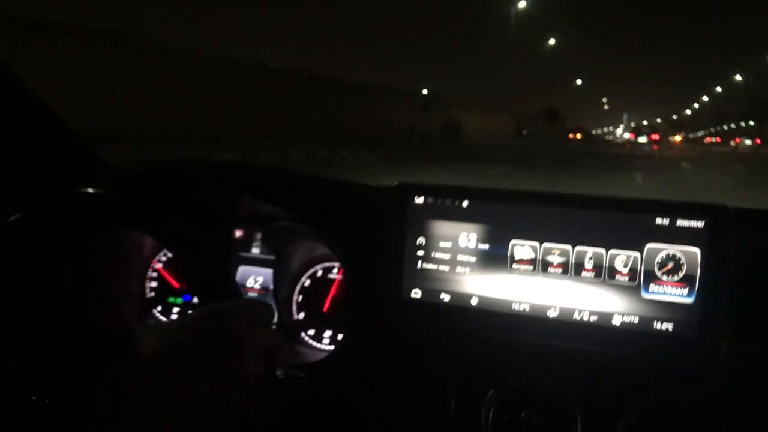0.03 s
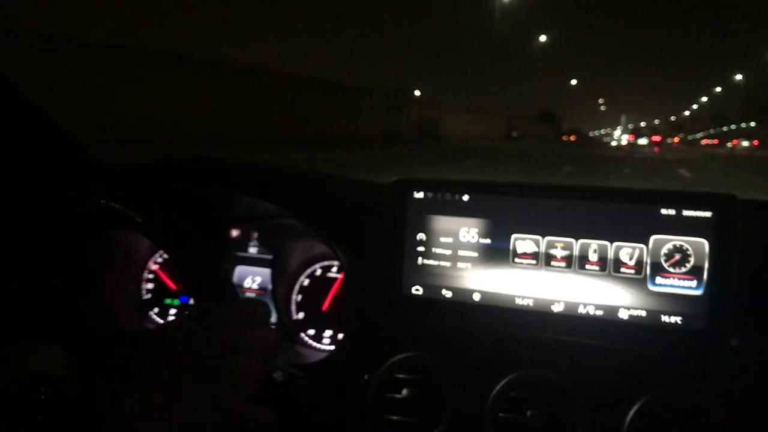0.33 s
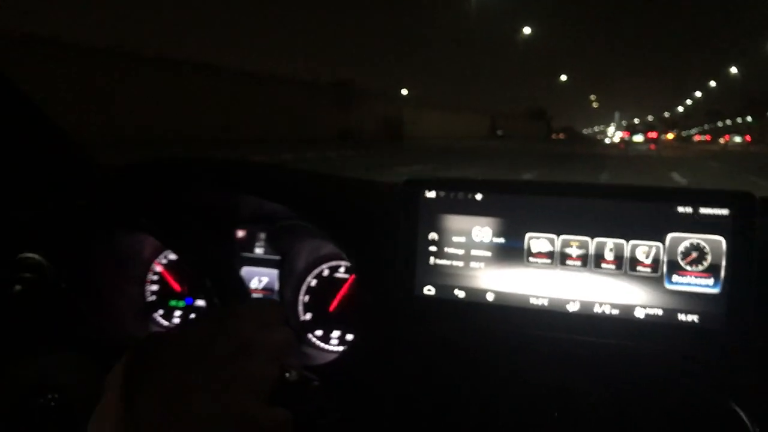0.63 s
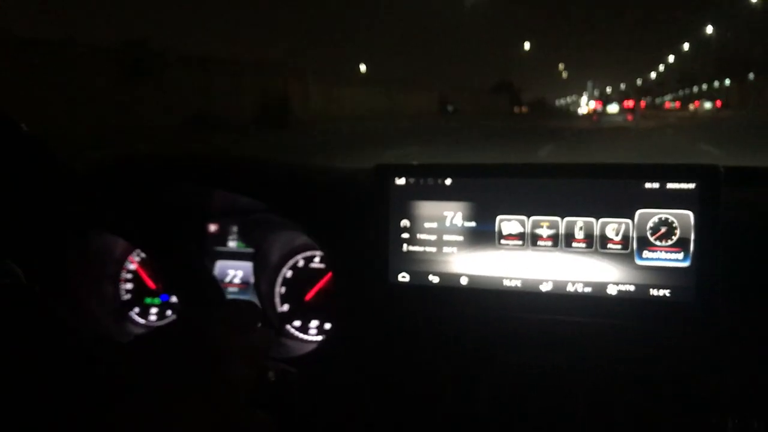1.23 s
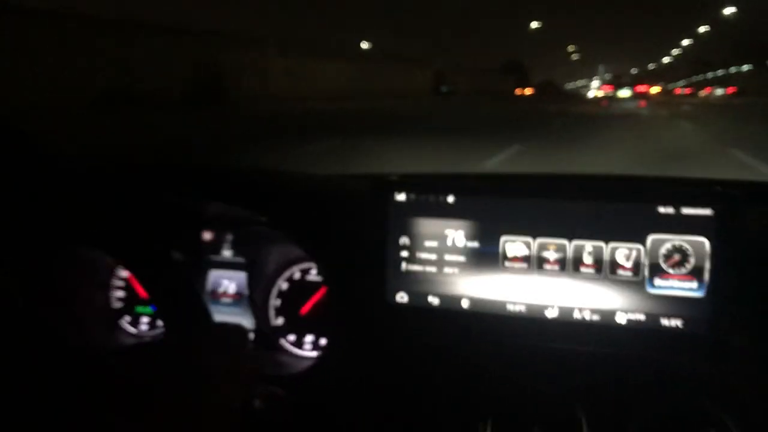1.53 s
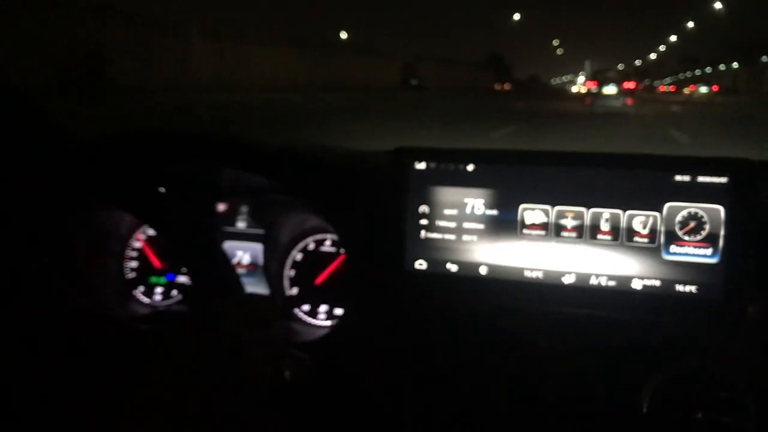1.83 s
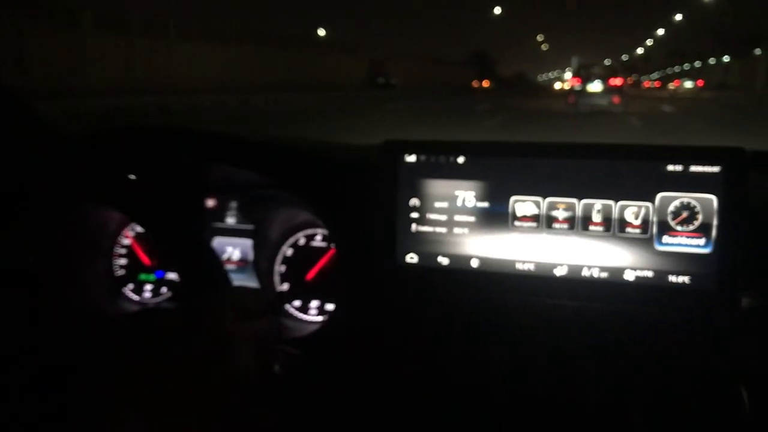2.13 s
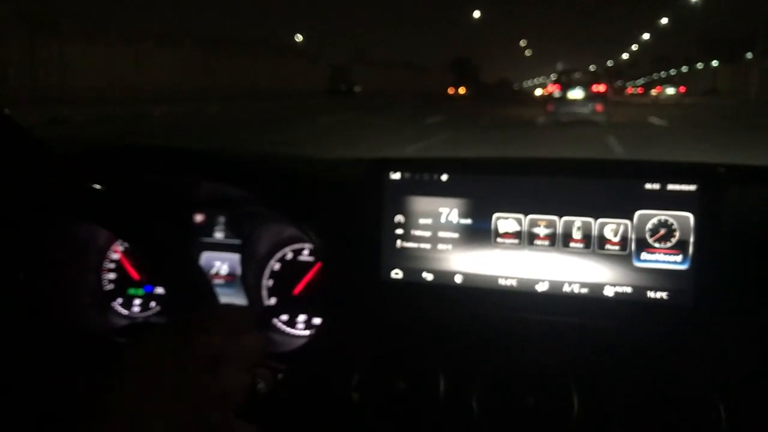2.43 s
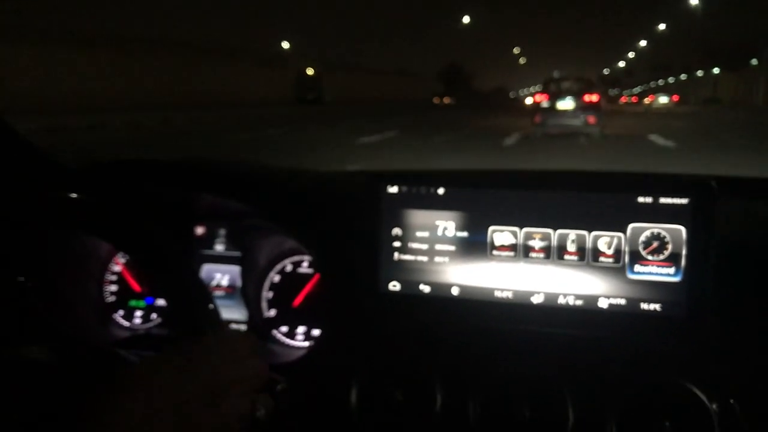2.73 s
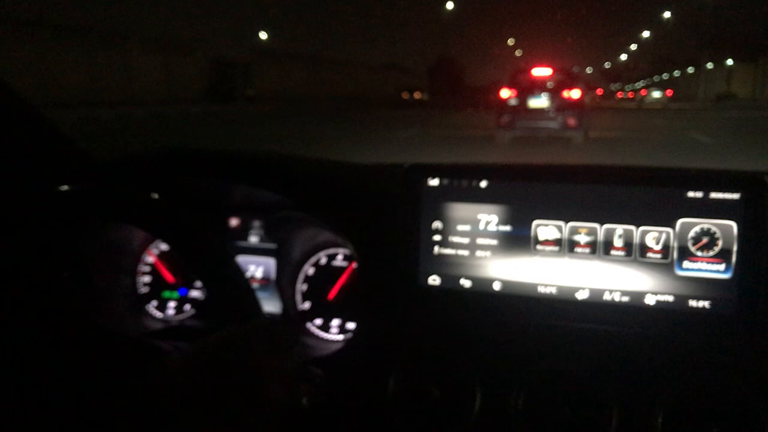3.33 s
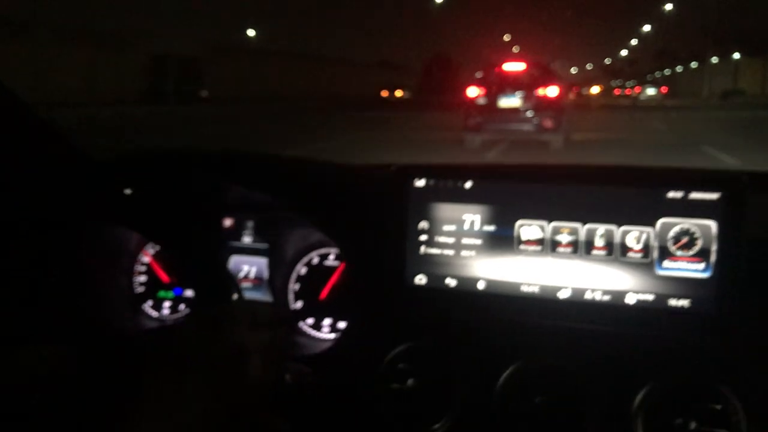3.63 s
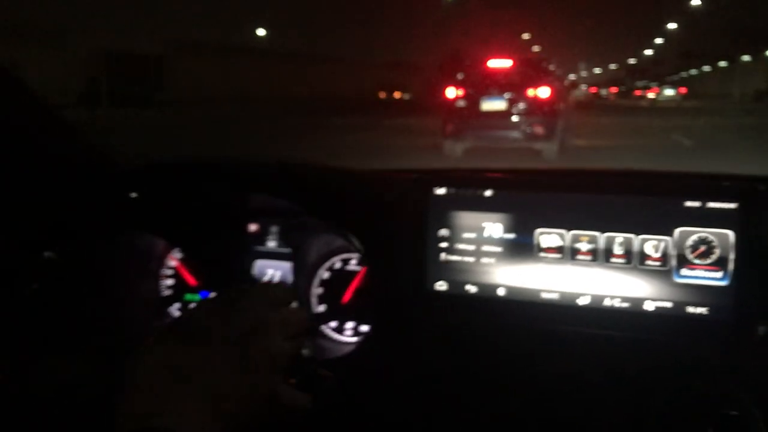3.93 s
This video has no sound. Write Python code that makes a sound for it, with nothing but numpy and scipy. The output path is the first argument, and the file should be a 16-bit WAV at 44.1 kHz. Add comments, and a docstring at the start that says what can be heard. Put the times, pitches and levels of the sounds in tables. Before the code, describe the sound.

A sports car engine drones, then its exhaust pops and bangs, heard from inside.

```python
"""A four-cylinder drone pulls over road rumble and tyre noise, inside a sports car on a night highway.
The driver lifts off: the pipe chuffs, the drone thins and sags, and unburnt fuel pops in the exhaust,
first as a burble, then in hard bangs. Each pop booms in the cabin and cracks with a ring of pipe metal;
the bangs set the trim buzzing."""
import sys
import numpy as np
from scipy import signal
from scipy.fft import rfft, irfft
from scipy.io import wavfile

SR = 44100
rng = np.random.default_rng(int(sys.argv[2]) if len(sys.argv) > 2 else 0)


def file_out(sig):
    """Save sig as 16-bit WAV at sys.argv[1]."""
    # one column per channel
    cols = np.atleast_2d(sig).T
    # limit, then scale
    lim = np.clip(cols, -1, 1)
    pcm = np.round(lim * 32767).astype(np.int16)
    wavfile.write(sys.argv[1], SR, pcm)


N = 176400
TIME = np.arange(N) / SR

# The main exhaust pops, with a fader per layer: start_s, boom_db, crack_db, buzz_db, sizzle_db
POPS = [(1.3326, -3, -69, -52, -77), (1.3516, -17, -65, -50, -78), (1.3965, -8, -70, -56, -72),
        (1.4203, -2, -70, -69, -76), (1.4345, -14, -56.5, -60, -74), (1.4566, -4.5, -76, -54, -80),
        (1.47, -18.5, -61, -45, -82), (1.6436, -19.5, -57, -50, -62), (1.6528, -8, -58, -53, -74),
        (1.7331, -4.5, -61, -46, -82), (1.7954, -8.5, -61, -68, -88), (1.8576, -9.5, -63, -46, -84),
        (1.9237, -7, -60, -43, -80), (1.9669, -5.5, -55.5, -56, -76), (2.0396, -6.5, -60.5, -49, -82),
        (2.1095, -4, -56, -61, -77), (2.2705, -5.5, -77, -48, -82), (2.3403, -6, -54, -55, -74),
        (2.3966, -7, -58, -48, -68), (2.461, -5.5, -62.5, -61, -82), (2.5094, -7, -77, -54, -82),
        (2.5624, 2.5, -50, -41, -74), (2.6687, -5, -54.5, -43, -73), (2.7525, -4, -50, -34.5, -61),
        (2.83, -7.5, -69, -42, -77), (2.885, -2.5, -55.5, -40, -78), (2.9683, -0.5, -51, -36.5, -64),
        (3.0773, -4.5, -59, -48, -83), (3.1741, -2.5, -52, -50, -62), (3.288, 1.5, -53, -37, -73),
        (3.392, -6.5, -53, -59, -79), (3.4435, -5, -78, -62, -84), (3.5228, 1, -46.5, -38.5, -55),
        (3.6018, -14, -52, -44, -63), (3.6473, -1, -49.5, -35, -52.5), (3.7226, -15, -50, -38, -53),
        (3.7457, 0.5, -50.5, -36, -60), (3.8205, -17, -53.5, -40, -60.5), (3.8966, -11.5, -51, -64, -64),
        (3.9064, -6, -78, -61, -78), (3.971, -20, -57.5, -56, -67)]


def amp(db):
    """Decibels to gain."""
    return 10 ** (np.asarray(db) / 20)


def unit(x):
    """Scales to rms 1."""
    return x / np.sqrt(np.mean(x ** 2) + 1e-20)


def curve(table, column=1):
    """One column of a time table, drawn as an automation lane."""
    rows = np.array(table)
    return np.interp(TIME, rows[:, 0], rows[:, column])


def noise(gain):
    """Noise of rms 1, shaped by a gain that is a function of frequency."""
    spectrum = rfft(rng.standard_normal(N))
    return unit(irfft(spectrum * gain(np.fft.rfftfreq(N, 1 / SR)), N))


def coloured(points):
    """Noise of rms 1 through an EQ curve of freq_hz, gain_db points."""
    hz, db = np.transpose(points)
    return noise(lambda f: amp(np.interp(np.log(f + 1), np.log(hz + 1), db)))


def ringing(hz, width_hz):
    """Noise of rms 1 in one steep resonance."""
    return noise(lambda f: 1 / (1 + (2 * (f - hz) / width_hz) ** 4) ** .5)


def wander(rate_hz):
    """Random modulation of rms 1, mostly slower than rate_hz."""
    return noise(lambda f: (f > 0) / (1 + (f / rate_hz) ** 4))


def swell(t, peak_s):
    """An envelope that rises to 1 at peak_s and dies away."""
    return t / peak_s * np.exp(1 - t / peak_s)


def add(mix, start_s, sound):
    """Drops a sound into the mix at start_s."""
    part = mix[max(round(start_s * SR), 0):][:len(sound)]
    part += sound[:len(part)]


def road(rumble_db=-29, tyre_db=-51, flutter_db=0.84):
    """The bed: road rumble and wind hiss through the body, with one tyre resonance."""
    # Colour of road and wind: freq_hz, gain_db
    road_eq = [(14, -23), (25, -2), (42, 1), (65, 2), (100, -4.5), (140, 1), (200, -7.5), (290, -13.5),
               (400, -17.5), (480, -24), (700, -20), (1000, -24), (1300, -26), (1700, -30), (2100, -37.5),
               (3000, -40), (4300, -43), (5800, -49), (7300, -53.5), (8500, -53), (10300, -59.5),
               (11500, -59), (15500, -61)]
    bed = amp(rumble_db) * coloured(road_eq) + amp(tyre_db) * ringing(hz=887, width_hz=35)
    return bed * amp(flutter_db * wander(rate_hz=9))


def ticks_and_whistle():
    """Small plastic ticks in the cabin, and a faint high whistle that comes and goes."""
    # Plastic ticks: start_s, level_db
    tick_cues = [(.883, -59), (0.9654, -48.5), (.994, -60)]
    # Their bright colour: freq_hz, gain_db
    tick_eq = [(3000, -20), (7000, -8), (9000, 2), (12000, 0), (15500, -3)]
    # Bands of the whistle: pitch_hz, width_hz, level_db
    whistle_bands = [(8250, 450, -68.5), (9350, 400, -68)]
    # Its fade in and out: time_s, gain_db
    whistle_fade = [(2.1, -34), (2.2, -5), (2.4, -8), (2.65, -11), (3, -30)]
    tick_env = np.zeros(N)
    for start_s, db in tick_cues:
        add(tick_env, start_s, amp(db) * swell(TIME[:SR // 10], peak_s=.0035))
    whistle = sum(amp(db) * ringing(hz, width) for hz, width, db in whistle_bands)
    return tick_env * coloured(tick_eq) + amp(curve(whistle_fade)) * whistle


def rattles():
    """Loose trim gives short buzzes between the late bangs."""
    # Trim rattles: start_s, pitch_hz, width_hz, level_db, rise_s
    rattle_cues = [(3.251, 2300, 400, -47, .004), (3.35, 1580, 446, -42.5, 0.01),
                   (3.583, 2450, 800, -47, 0.0087), (3.706, 1750, 400, -42, 0.0097),
                   (3.838, 1870, 350, -48, 0.01), (3.896, 1210, 300, -42, 0.0058),
                   (3.95, 1250, 350, -41, 0.012)]
    mix = np.zeros(N)
    for start_s, hz, width, db, rise_s in rattle_cues:
        mix += amp(db) * swell(np.maximum(TIME - start_s, 0), rise_s) * ringing(hz, width)
    return mix


def exhaust_flow():
    """A gruff chuff in the pipe as the throttle shuts, over the soft rush of gas still flowing."""
    # Envelope of the chuff: time_s, level_db
    chuff_level = [(1.29, -85), (1.335, -26), (1.39, -32), (1.44, -34.5), (1.52, -33.5), (1.6, -51),
                   (1.9, -65)]
    # Envelope of the gas flow: time_s, level_db
    flow_level = [(1.1, -53), (1.3, -45.5), (1.55, -44), (1.7, -41.5), (2.1, -46.5), (2.6, -48), (3.2, -51),
                  (4, -52)]
    # Colour of the gas flow: freq_hz, gain_db
    flow_eq = [(200, -10), (450, -4), (750, 5), (1200, 2), (1900, -11), (2300, -22.5), (3100, -15),
               (4000, -31.5), (8000, -44.5), (15500, -40.5)]
    chuff = amp(curve(chuff_level)) * ringing(hz=236, width_hz=110)
    return chuff + amp(curve(flow_level)) * coloured(flow_eq)


def breathing(firing_phase, rush_db=-44, pulse_depth=0.21):
    """Air rushes through intake and exhaust, pulsed by each firing, and the intake whistles."""
    # Narrow intake whistles: pitch_hz, width_hz, level_db
    intake_bands = [(1016, 17, -52.5), (2724, 110, -62.5), (3594, 67, -68), (3755, 37, -62.5),
                    (4460, 39, -64), (4780, 100, -60.5), (7030, 100, -78.5)]
    # Colour of the rush: freq_hz, gain_db
    rush_eq = [(100, 7.5), (300, -3.5), (500, -13.5), (1000, -3.5), (1400, -7.5), (2100, -15), (3000, -13),
               (4300, -12.5), (6500, -28.5), (10000, -35), (15500, -34.5)]
    whistles = sum(amp(db) * ringing(hz, width) for hz, width, db in intake_bands)
    rush = unit(coloured(rush_eq) * (1 + pulse_depth * np.cos(firing_phase)))
    return amp(rush_db) * rush + whistles


def growl(firing_phase, mean_hz, rough_hz, rasp_db=-59, knee_hz=1250, slope_db_per_octave=-21.5):
    """Uneven cylinders put partials on quarter multiples of the firing rate: a few firm, the rest rasp."""
    # Firm partials at full load: firing_multiple, level_db
    partials = [(.25, -35.5), (.5, -49), (.75, -32.5), (1.25, -43), (1.5, -45), (1.75, -44.5), (2, -34.5),
                (2.5, -44.5), (3, -47.5), (3.5, -50.5), (4, -48.5), (5.75, -48), (6, -55.5), (6.5, -50.5)]
    firm_db = dict(partials)
    shake = wander(rough_hz)
    blurred_phase = firing_phase + .14 * wander(rate_hz=28)  # uneven burns smear the upper partials
    mix = np.zeros(N)
    for multiple in np.arange(1, 48) / 4:
        if multiple == 1:  # engine() plays the firing tone
            continue
        octaves_over_knee = max(np.log2(multiple * mean_hz / knee_hz), 0)
        db = firm_db.get(multiple, rasp_db + slope_db_per_octave * octaves_over_knee)
        depth = 0.14 if multiple in firm_db else 1.0
        waver = 1 + depth * np.roll(shake, rng.integers(N))
        mix += amp(db) * waver * np.sin(multiple * blurred_phase + 2 * np.pi * rng.random())
    return mix


def engine(rough_hz=14, pitch_jitter=0.0022):
    """Cylinder firings make the drone; load brings up growl and breath, lifting off leaves it thin."""
    # The firing tone: time_s, pitch_hz, level_db
    firing = [(0, 153.7, -23.5), (.25, 157.6, -22), (.6, 165.6, -25), (1.15, 176.3, -26.5),
              (1.28, 176.5, -30), (1.45, 171.4, -24), (1.65, 175.3, -26.5), (2.1, 171.5, -28),
              (2.6, 169.7, -31), (3.2, 166, -28), (4, 160.7, -31.5)]
    # The throttle: time_s, load_db
    throttle = [(0, -1.5), (.3, -2.5), (.7, -0.5), (1.0, -0.5), (1.17, 2), (1.28, -3), (1.44, -11.5),
                (2.5, -13), (4, -21)]
    # Partials that come forward off the throttle: firing_multiple, level_db
    overrun_partials = [(1.75, -48), (2, -56), (2.5, -50.5), (3, -60), (3.5, -52.5)]
    firing_hz = curve(firing) * (1 + pitch_jitter * wander(rough_hz))
    phase = 2 * np.pi * np.cumsum(firing_hz) / SR
    load_db = curve(throttle)
    lift_off = 1 - np.minimum(amp(load_db), 1)
    drone = amp(curve(firing, column=2)) * np.sin(phase) * (1 + 0.15 * wander(rough_hz))
    drone += amp(load_db) * growl(phase, firing_hz.mean(), rough_hz)
    for multiple, db in overrun_partials:
        waver = 1 + 0.54 * wander(rough_hz)
        drone += amp(db) * lift_off * waver * np.sin(multiple * phase + 2 * np.pi * rng.random())
    breath = amp(1.17 * load_db) * breathing(phase)  # falls away faster than the growl
    return np.sqrt(2) * drone + breath  # sqrt(2) makes the sine levels rms


def burble(slots_per_s=32, spread_db=3, crack_offset_db=-58.5, clearance_s=.015):
    """Weak pops at random moments, clear of the main ones: rows like POPS, with the trim silent."""
    # Weight of the small pops: time_s, boom_db
    burble_level = [(1.25, -50), (1.34, -15), (1.55, -15), (2.4, -16), (3, -21), (4, -25)]
    rows = []
    for slot, (place, size) in enumerate(rng.random((int(slots_per_s * N / SR), 2))):
        start_s = (slot + place) / slots_per_s
        db = np.interp(start_s, *np.transpose(burble_level)) + spread_db * (2 * size - 1)
        if min(abs(start_s - pop[0]) for pop in POPS) > clearance_s:
            rows.append((start_s, db, db + crack_offset_db, -np.inf, -np.inf))
    return rows


def metal_ring(t, detune=0.0063, spread_db=5.5):
    """The exhaust's metal rings, struck a little differently by every pop."""
    # Modes of the metal: pitch_hz, level_db, decay_s
    modes = [(1120, -3, .008), (1590, 3, .014), (2300, -5, .01), (2560, -4, .01), (2920, -2, .014),
             (3380, -3, .012), (3630, 0, .011), (4300, -4, .011), (4580, -2, .011), (4780, -3, .013),
             (5380, -4, .012), (5620, -3, .012), (5950, -4, .011), (8350, -14, .009)]
    ring = np.zeros(len(t))
    for hz, db, decay_s in modes:
        force, bend, start_cycles = rng.standard_normal(3)
        envelope = amp(db + spread_db * np.tanh(force)) * np.exp(-t / decay_s)
        ring += envelope * np.sin(2 * np.pi * (hz * (1 + detune * bend) * t + start_cycles))
    return ring


def exhaust_pops(boom_lead_s=0.0019, trim_lag_s=0.0017):
    """Unburnt fuel fires in the pipe: a boom, a turbulent puff, a ringing crack, then buzzing trim."""
    # Low modes of pipe and cabin: pitch_hz, level_db, rise_s
    boom_modes = [(123.4, -11.5, 0.0096), (103.3, -12.5, 0.014), (165.4, -15.5, 0.0059),
                  (249, -19.5, 0.0051), (334, -32.5, 0.0047), (417.3, -39, .009), (69, -29, .012)]
    t = TIME[:SR // 8]
    boom = -sum(amp(db) * swell(t, rise) ** 2 * np.sin(2 * np.pi * hz * t) for hz, db, rise in boom_modes)
    attack = 1 - np.exp(-t / .001)
    snap = attack * (np.exp(-t / .01) + amp(-3.5) * np.exp(-t / .012))
    body, puff_env, crack_env, buzz_env, sizzle_env = np.zeros((5, N))
    for start_s, boom_db, crack_db, buzz_db, sizzle_db in list(POPS) + burble():
        add(body, start_s - boom_lead_s, amp(boom_db + 0.36) * boom)
        add(body, start_s, amp(crack_db - 0.5) * attack * metal_ring(t))
        add(puff_env, start_s, amp(boom_db - 31) * swell(t, peak_s=.008))
        add(crack_env, start_s, amp(crack_db + 10) * snap)
        add(buzz_env, start_s + trim_lag_s, amp(buzz_db - 2.5) * swell(t, peak_s=0.0067))
        add(sizzle_env, start_s + trim_lag_s, amp(sizzle_db + 2) * swell(t, peak_s=0.0083))
    # Colour of the crack: freq_hz, gain_db
    crack_eq = [(200, 6.5), (550, 12.5), (1100, 11.5), (2100, 1), (2600, 3), (3100, -5.5), (3600, 3),
                (4700, 1.5), (5200, -3.5), (5800, -2), (6600, -10.5), (8600, -18.5), (10000, -24.5),
                (15500, -34)]
    # Colour of the trim's sizzle: freq_hz, gain_db
    sizzle_eq = [(3000, -14), (6000, 8), (8500, 2), (10200, -6), (11500, 0), (15500, -4)]
    gas = puff_env * ringing(hz=280, width_hz=110) + crack_env * coloured(crack_eq)
    trim = buzz_env * ringing(hz=1628, width_hz=246) + sizzle_env * coloured(sizzle_eq)
    return body + gas + trim


def cabin_colour(x):
    """The cabin's narrow peaks and dips, as a minimum-phase EQ."""
    # Cabin resonances and notches: freq_hz, width_hz, gain_db
    bands = [(694, 21, 3.5), (820, 130, 0), (1140, 29, -0.5), (1562, 54, -3.5), (1571, 16, 2),
             (1628, 13, 0), (1970, 68, 1.5), (2410, 90, 2.5), (2870, 100, -2.5), (2880, 55, 3.5),
             (2940, 79, 1.5), (3540, 80, 2), (3700, 150, -0.5), (4370, 220, 0.5), (4780, 190, -6),
             (5350, 64, 3), (5550, 53, 0), (6950, 200, 1.5), (7650, 450, -2.5), (10350, 460, -2.5),
             (11500, 300, 2), (12900, 400, 1.5)]
    f = np.fft.rfftfreq(8192, 1 / SR)
    db = sum(gain / (1 + (2 * (f - hz) / width) ** 4) for hz, width, gain in bands)
    log_gain = np.log(amp(np.r_[db, db[-2:0:-1]]))
    spectrum = np.exp(np.conj(signal.hilbert(log_gain)))
    impulse = np.fft.ifft(spectrum).real[:len(f)]
    return signal.oaconvolve(x, impulse)[:N]


def scene():
    """The mono mix as heard from the driver's seat."""
    mix = engine() + exhaust_flow() + road() + exhaust_pops() + rattles() + ticks_and_whistle()
    return cabin_colour(mix)[None]


def record(dry, low_cut_hz=4.3, high_cut_hz=15750, fade_s=.002):
    """A subsonic cut, a tiny fade at each end and a steep high cut."""
    low_cut = signal.butter(1, low_cut_hz, "high", fs=SR, output="sos")
    high_cut = signal.firwin(801, high_cut_hz, window=("kaiser", 9), fs=SR)
    fades = np.minimum(np.minimum(TIME, TIME[::-1]) / fade_s, 1)
    return signal.oaconvolve(signal.sosfilt(low_cut, dry) * fades, high_cut[None], "same")


dry = scene()
out = record(dry)
file_out(out)
```